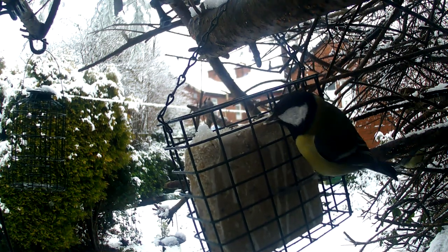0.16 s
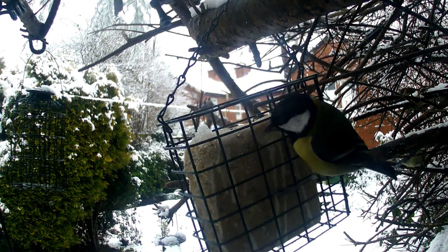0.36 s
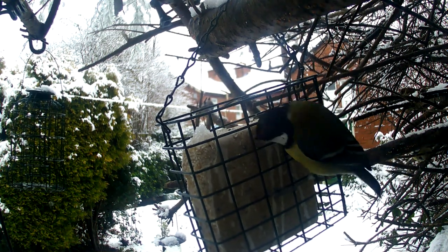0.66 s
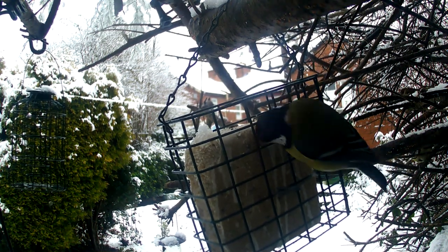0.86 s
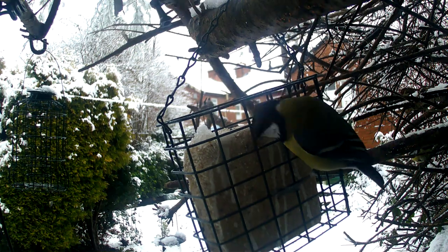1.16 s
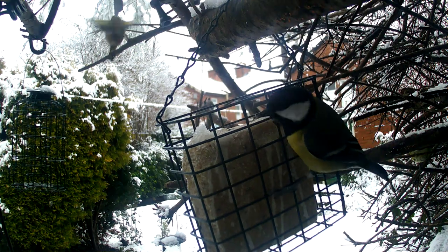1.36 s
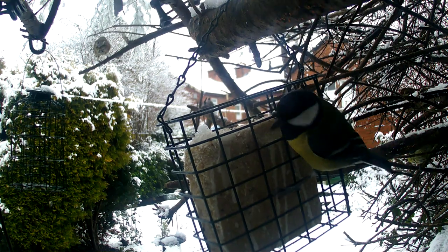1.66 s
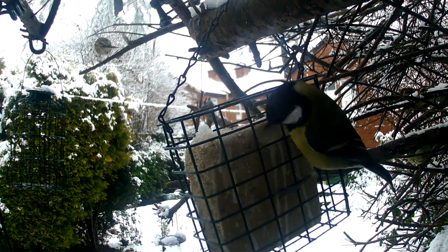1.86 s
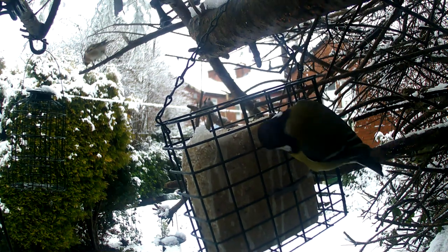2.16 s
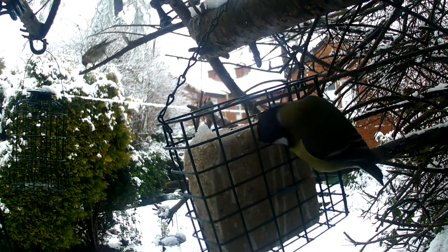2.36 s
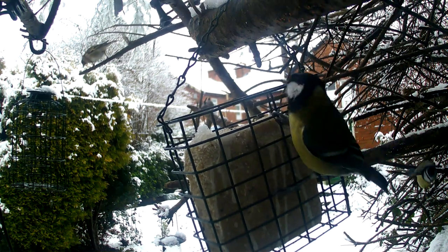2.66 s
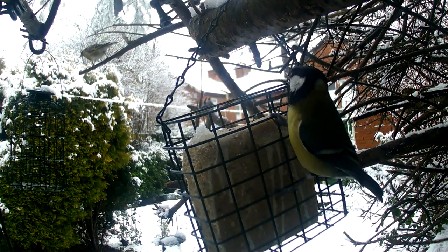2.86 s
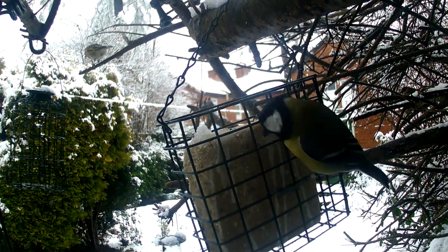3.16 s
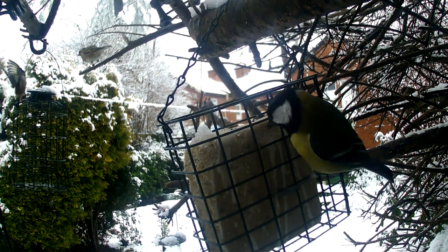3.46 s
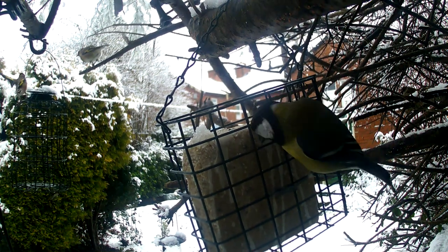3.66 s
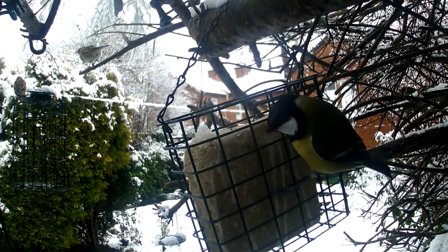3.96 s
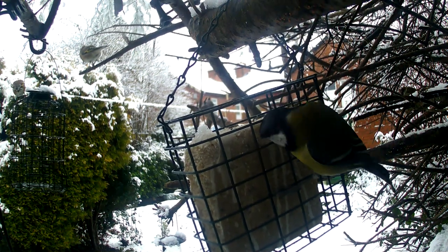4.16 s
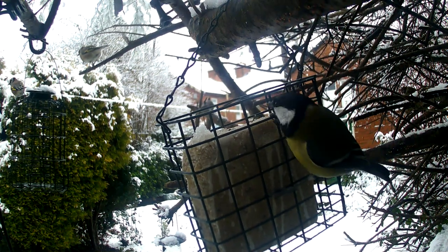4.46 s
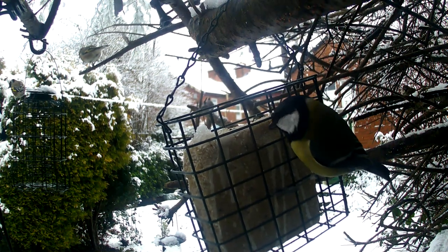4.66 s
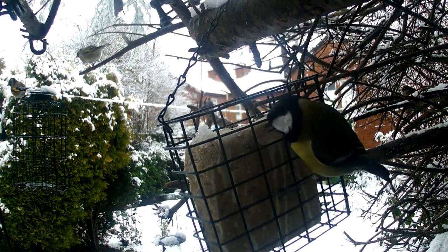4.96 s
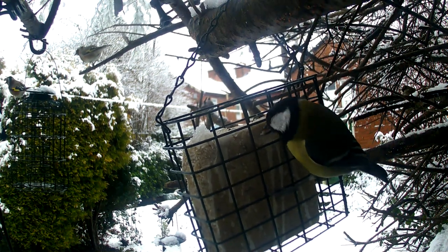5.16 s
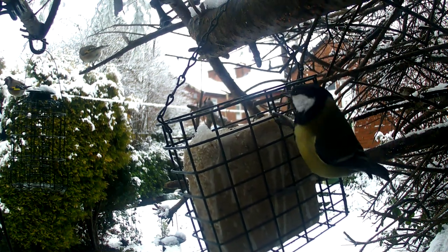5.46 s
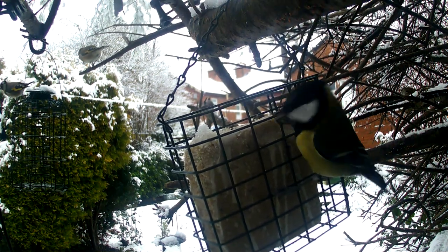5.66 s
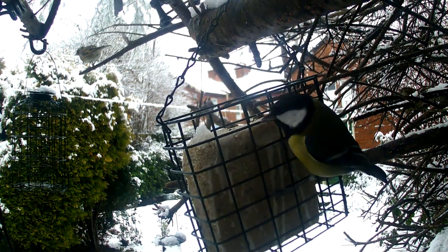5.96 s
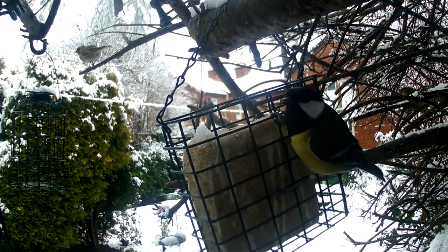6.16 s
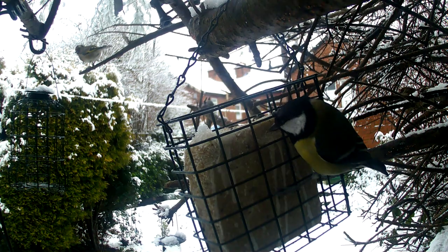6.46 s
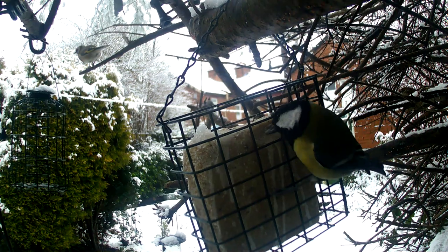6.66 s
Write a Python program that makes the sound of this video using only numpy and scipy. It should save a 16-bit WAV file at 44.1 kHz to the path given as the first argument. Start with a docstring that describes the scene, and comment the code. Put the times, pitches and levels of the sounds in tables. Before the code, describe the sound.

Irregular close beak taps, short whistled bird notes, hoarse sparrow cheeps and a brief scolding tick series over soft distant traffic and deep rumble.

```python
"""A snowy garden: close by, a tit pecks at a fat block in a wire cage, each peck a burst of damped modes.
Farther off, small birds chip, tick and cheep as tones on swept pitch curves; a larger bird calls once.
Behind them lie shaped noise for a low rumble and distant traffic, and wavering tones for a faint hum.
The small microphone dulls birds and pecks above about 3 kHz, most of all near 5 kHz, and adds a thin hiss.
"""
import sys
import numpy as np
from scipy import signal
from scipy.fft import rfft, irfft, next_fast_len
from scipy.io import wavfile
from scipy.ndimage import map_coordinates

SR = 44100
rng = np.random.default_rng(int(sys.argv[2]) if len(sys.argv) > 2 else 0)


def master_out(mix):
    """Clip the mix to full scale and print it as 16-bit PCM to the path in sys.argv[1]."""
    frames = np.transpose(np.atleast_2d(mix))
    ceiling = np.clip(frames, -1, 1)
    pcm = np.round(ceiling * 32767).astype(np.int16)
    wavfile.write(sys.argv[1], SR, pcm)


N = 299439  # length in samples

# The contact notes near and far share a bulge of pitch in octaves and a steepness of swell.
CHIP_ARCH_OCT, CHIP_STEEP = 0.085, 0.76


def amp(db):
    """Decibels to gain."""
    return 10 ** (np.asarray(db) / 20)


def unit(x):
    """Scale to rms 1."""
    return x / np.sqrt(np.mean(x ** 2) + 1e-20)


def wobble(rate, size):
    """A smooth random curve of size samples, with rate knots a second."""
    knots = rng.standard_normal(size // 16 + 8)
    return map_coordinates(knots, [np.arange(size) * rate / SR], mode="mirror")


def filtered(x, response):
    """x times a gain that depends on frequency."""
    m = next_fast_len(N + 8192)
    gain = response(np.fft.rfftfreq(m, 1 / SR))
    return irfft(rfft(x, m) * gain, m)[:N]


def coloured(x, points):
    """x through a (Hz, dB) curve on a log frequency axis."""
    f, db = np.transpose(points)
    return filtered(x, lambda hz: amp(np.interp(np.log(hz + 1), np.log(f), db)))


def noise(points):
    """Noise of rms 1 with the given spectral shape."""
    return unit(coloured(rng.standard_normal(N), points))


def add(track, s, sound):
    """Mix a sound into the track at s seconds."""
    part = track[max(round(s * SR), 0):][:len(sound)]
    part += sound[:len(part)]


def voice(hz, overtones_db):
    """A tone on a pitch curve: a sum of sine harmonics, with one level for each."""
    phase = 2 * np.pi * np.cumsum(hz) / SR
    harmonics = sum(amp(db) * np.sin((k + 1) * phase) for k, db in enumerate(overtones_db))
    return np.sqrt(2) * harmonics


def arch(length, pitch_hz, sweep, bulge, steep, crest=.5, peak_db=0):
    """Pitch and loudness of a note: a sweep with a bulge (both in octaves) under one swell.

    The swell peaks at crest, a share of the length; peak_db deepens its fall towards both ends.
    """
    u = np.linspace(-1, 1, max(int(length * SR), 8))
    off_crest = np.interp(u, [-1, np.clip(2 * crest - 1, -1, 1), 1], [1, 0, 1])
    swell = np.abs(np.cos(np.pi * off_crest / 2)) ** steep * amp(-peak_db * off_crest)
    hz = pitch_hz * 2 ** (sweep * u / 2 - bulge * u ** 2)
    return hz, swell


def whistle(length, pitch_hz, sweep, rough, bulge, steep):
    """One nearly pure note; roughness makes its pitch and loudness tremble."""
    hz, swell = arch(length, pitch_hz, sweep, bulge, steep, crest=0.51)
    hz = hz * (1 + 0.059 * rough * wobble(600, len(hz)))
    tremble = unit(amp(4.1 * rough * wobble(320, len(hz))))
    return swell * tremble * voice(hz, [0, -26])


def garden(x, wet_db, t60, echo_db):
    """Nearby walls return a few weak copies; branches scatter a short tail."""
    t = np.arange(SR // 2) / SR
    tail = rng.standard_normal(len(t)) * amp(-60 * t / t60) * (1 - np.exp(-t / 0.0046))
    answer = amp(wet_db) * tail / np.linalg.norm(tail)
    for delay, db in [(.0065, -1), (.011, 0), (.019, -2.5)]:
        answer[round(delay * SR)] += amp(echo_db + db)
    return x + signal.fftconvolve(x, answer)[:N]


def rumble():
    """Low noise that sways at random and rises in broad swells, with a wandering deep drone in it."""
    # Each row: frequency in Hz, relative density in dB per Hz.
    rumble_shape = [(10, -11.5), (22, 7.5), (32, -3), (38, -5.5), (48, -3.5), (57, -5), (78, -7.5),
                    (100, -19.5), (140, -28), (300, -61)]
    # Each row: crest in seconds, half width in seconds (to 1/e of the rise), rise in dB.
    swells = [(1.2, 0.37, 2.5), (3.35, 0.26, 4.5), (4.5, 0.1, 3), (5.57, 0.12, 5)]
    rest_db, sway_db, sway_per_s = -45, 1.46, 9
    drone_hz, drone_wander_hz, drone_db = 43.63, 3.5, -2.5  # drone level against the noise
    t = np.arange(N) / SR
    swell_db = sum(db * np.exp(-((t - s) / width) ** 2) for s, width, db in swells)
    drone = voice(drone_hz + drone_wander_hz * wobble(11, N), [drone_db])
    level = amp(rest_db + swell_db + sway_db * wobble(sway_per_s, N))
    return level * (noise(rumble_shape) + drone)


def traffic():
    """The wash of distant traffic: noise weakening towards the treble, its level swaying slightly."""
    # Each row: frequency in Hz, relative density in dB per Hz.
    traffic_shape = [(59, -39.5), (100, -3.5), (183, -4), (205, -5), (364, -6.5), (466, -9.5), (725, -10),
                     (813, -7.5), (882, -8), (1040, -9.5), (1150, -11.5), (1390, -13.5), (1640, -15),
                     (3160, -22), (5000, -43), (6500, -79), (11000, -120)]
    return amp(-51.5 + 0.49 * wobble(3.73, N)) * noise(traffic_shape)


def hum():
    """A few low tones, each wavering in pitch and level."""
    # Each row: middle frequency in Hz, middle level in dB rms.
    hum_tones = [(120, -66), (151, -63), (181, -61.5), (332, -67), (361, -70.5)]
    out = np.zeros(N)
    for hz, db in hum_tones:
        level = amp(db + 1.8 * wobble(4, N))
        out += level * voice(hz + 1.52 * wobble(7, N), [0])
    return out


def hiss():
    """The microphone's own thin, steady noise, strongest near 7 kHz."""
    # Each row: frequency in Hz, relative density in dB per Hz.
    hiss_shape = [(3000, -27.5), (4500, -23.5), (5300, -3.5), (6200, 4), (7100, 10), (7400, -6)]
    return amp(-72.5) * noise(hiss_shape)


def ring(modes, pitch_hz):
    """A blow on heavily damped modes; neighbouring modes start in opposite directions."""
    t = np.arange(SR // 40) / SR
    rise = 1 - np.exp(-t / .00008)
    out = np.zeros(len(t))
    for k, (ratio, db, t60) in enumerate(modes):
        decay = amp(db + rng.normal(0, 1) - 60 * t / t60)  # each blow excites the modes a little differently
        out += (-1) ** k * decay * np.sin(2 * np.pi * pitch_hz * ratio * t)
    return rise * out


def pecks():
    """Beak on fat and wire: each peck is a dull knock in the block and a sharp tick of the beak."""
    # Each row: start in seconds, gain of the knock in dB, gain of the tick in dB, tick pitch in Hz.
    blows = [(0.0594, -63, -32.5, 2550), (0.1175, -29.5, -36.5, 2930), (.7710, -34.5, -37, 2200),
             (0.9613, -26.5, -25.5, 2520), (1.248, -26, -31, 2380), (1.9924, -48, -31, 2920),
             (2.2172, -30.5, -30.5, 2270), (2.4715, -35, -31.5, 2700), (3.2010, -44, -38, 2100),
             (3.361, -32, -44, 2190), (3.4052, -48, -43, 2800), (3.6939, -28, -34, 2570),
             (4.2350, -50, -40.5, 2500), (4.4030, -34.5, -41, 2400), (4.9443, -34, -44, 2900),
             (5.1914, -32.5, -33, 2240), (5.4294, -38, -44, 2800), (5.8060, -36, -40, 2880),
             (5.9820, -31.5, -40, 2480)]
    # Modes of the fat block. Each row: multiple of its lowest mode, relative level in dB, t60 in seconds.
    block_modes = [(1, 3.5, 0.0056), (1.6, -1, 0.0057)]
    # Modes of the beak's tick. Each row: multiple of the tick pitch, relative level in dB, t60 in seconds.
    beak_modes = [(1, 5.5, 0.003), (1.35, -1.5, 0.0043), (1.8, 1.5, 0.0019)]
    block_hz = 915  # lowest mode of the fat block
    out = np.zeros(N)
    for s, knock_db, tick_db, tick_hz in blows:
        knock = amp(knock_db) * ring(block_modes, block_hz)
        tick = amp(tick_db) * ring(beak_modes, tick_hz)
        add(out, s, knock + tick)
    return out


def chips():
    """Short whistled contact notes, most of them rising, some clear and some trembling."""
    # Each row: start in seconds, length in seconds, mid-note pitch in Hz, sweep in octaves,
    # level in dB ahead of garden and microphone, roughness (0 is clear).
    notes = [(0.063, 0.022, 3490, 0.1, -45.5, .3), (1.025, .07, 4700, 0.06, -53, 0.3),
             (1.754, 0.026, 2770, 0.2, -52, 0.65), (1.786, 0.021, 2760, 0.2, -48, 0.33),
             (1.908, 0.045, 2980, -.06, -60, .9), (1.94, 0.022, 3950, 0.4, -54, 0.5),
             (1.949, 0.027, 3930, .7, -52, 1.2), (2.011, 0.02, 2770, 0.19, -56, .8),
             (2.015, .043, 3760, -0.7, -54, 0.73), (2.052, 0.039, 3880, .08, -48, 0.33),
             (2.535, 0.012, 3670, 0.66, -45, 0.25), (2.632, 0.022, 3390, 0.4, -45.5, 0.7),
             (2.729, 0.029, 3150, 0, -44, 0.42), (3.223, 0.014, 2830, 0.12, -55.5, 0.2),
             (3.346, 0.029, 3330, .25, -55.5, 0.65), (3.458, .022, 2760, .05, -62, .3),
             (3.523, 0.03, 3000, -0.06, -54.5, 0.4), (3.587, 0.02, 3150, -.1, -60, 0.7),
             (4.113, 0.014, 2750, .24, -50.5, 0.2), (4.316, 0.016, 2920, 0.1, -57.5, .3),
             (4.683, 0.13, 3330, .02, -61.5, 0.6), (4.924, .03, 4440, -0.3, -54, .5),
             (5.214, 0.016, 2910, 0.16, -48.5, 0.4), (5.246, 0.021, 2850, 0.26, -45, 0),
             (5.351, 0.021, 3420, 0.22, -43, 0.2), (5.461, 0.019, 3060, 0.17, -44.5, 0),
             (5.86, 0.015, 4000, .29, -46.5, 0.16), (5.966, 0.016, 3320, 0.58, -37.5, .15),
             (6.088, 0.0203, 3330, 0.31, -44.5, 0.3), (6.272, 0.029, 4050, 0.34, -52, 0.6)]
    out = np.zeros(N)
    for s, length, hz, sweep, db, rough in notes:
        add(out, s, amp(db) * whistle(length, hz, sweep, rough, CHIP_ARCH_OCT, CHIP_STEEP))
    return out


def far_chips():
    """Birds across the garden put in a few faint, trembling notes at random times and pitches."""
    count, length_s, middle_hz, spread_oct, level_db, rough = 4, .05, 3300, .19, -64, 1
    out = np.zeros(N)
    for when, pitch, sweep in rng.uniform(-1, 1, (count, 3)):
        hz = middle_hz * 2 ** (spread_oct * pitch)
        note = whistle(length_s, hz, spread_oct * sweep, rough, CHIP_ARCH_OCT, CHIP_STEEP)
        add(out, (when + 1) / 2 * N / SR, amp(level_db) * note)
    return out


def syllable(length, pitch_hz, sweep, crest, rasp, flutter_hz):
    """A tone that an uneven flutter of the syrinx splits into grainy side tones, less so at its crest."""
    flutter_fall_oct, flutter_drift_oct = .4, .25  # the flutter slows through a syllable and drifts
    flutter_db, flutter_bend = 8, 0.15  # its depth in level and as a share of the pitch, at rasp 1
    jitter, grain_db = .05, 3.2  # random unsteadiness of pitch (share) and level, at rasp 1
    core_clears = .45  # share of the rasp that is gone at the crest
    hz, swell = arch(length, pitch_hz, sweep, bulge=.07, steep=0.95, crest=crest, peak_db=10.5)
    n = len(hz)
    rasp = rasp * (1 - core_clears * swell)
    fall = flutter_fall_oct * np.linspace(.5, -.5, n)
    rate = flutter_hz * 2 ** (fall + flutter_drift_oct * wobble(260, n))
    beat = 2 * np.pi * np.cumsum(rate) / SR
    hz = hz * (1 + rasp * (flutter_bend * np.sin(beat) + jitter * wobble(704.6, n)))
    grain = grain_db * np.sqrt(np.abs(rasp)) * wobble(260, n)
    pulse = unit(amp(rasp * flutter_db * np.sin(beat - 1.5) + grain))
    return swell * pulse * voice(hz, [0, -28])


def cheeps():
    """Sparrow cheeps: a hoarse held tone, an upward slur and a closing note over a clearer low voice.

    The windpipe and beak then colour both voices.
    """
    # Hoarse upper voice, three rows a cheep. Each row: start in seconds, length in seconds,
    # middle pitch in Hz, sweep in octaves, level in dB ahead of the throat,
    # loudest point as a share of the length, rasp depth, middle flutter rate in Hz.
    hoarse_tones = [(0.444, .09, 2936, -.1, -41, 0.54, 0.92, 337),
                    (.558, 0.0315, 3280, .55, -42.5, 0.36, 0.56, 764),
                    (0.581, 0.026, 2647, -.1, -41, 0.3, 2, 613),
                    (4.412, .08, 2984, .08, -40.5, 0.58, 1.13, 419),
                    (4.512, 0.043, 3200, .42, -39, 0.59, 0.8, 770),
                    (4.546, .026, 2885, -0.24, -35, 0.3, 0.94, 327),
                    (6.416, 0.0844, 3037, 0.1, -37, 0.42, 0.83, 333),
                    (6.543, 0.03, 3260, 0.68, -38.5, 0.48, 0.83, 600),
                    (6.571, .028, 3490, .6, -48, 0.46, 0.78, 716)]
    # Clearer lower voice. Each row: start in seconds, length in seconds, middle pitch in Hz,
    # sweep in octaves, level in dB ahead of the throat, roughness (0 is clear).
    low_tones = [(.458, 0.038, 1420, 0.071, -52, 0.75), (.549, 0.046, 1780, 1.2, -52, 0.24),
                 (4.427, .036, 2100, .6, -56, 0.8), (4.521, 0.04, 1720, 0.54, -50, 0.26),
                 (4.53, 0.022, 2510, .5, -49, 0.46), (6.432, 0.055, 1550, .1, -54.5, 1.1),
                 (6.541, 0.036, 1700, 0.87, -48.5, 0.4), (6.580, 0.014, 1920, .1, -48, .3)]
    # Windpipe and beak. Each row: frequency in Hz, gain in dB.
    throat = [(1200, -3.5), (2400, -2.5), (2950, -2.5), (3500, -2.5), (4200, 10), (5500, 18.5),
              (7000, -20.5)]
    out = np.zeros(N)
    for s, length, hz, sweep, db, crest, rasp, flutter_hz in hoarse_tones:
        add(out, s, amp(db) * syllable(length, hz, sweep, crest, rasp, flutter_hz))
    for s, length, hz, sweep, db, rough in low_tones:
        add(out, s, amp(db) * whistle(length, hz, sweep, rough, bulge=.09, steep=0.3))
    return coloured(out, throat)


def ticks():
    """A scolding bird flicks its pitch up about an octave in milliseconds; the flick levels off and fades."""
    # Each row: start in seconds, starting pitch in Hz, top pitch it closes in on in Hz,
    # level in dB ahead of garden and microphone.
    flicks = [(2.7262, 3200, 7220, -38), (2.7928, 2300, 4570, -45), (2.8006, 2700, 6760, -33.5),
              (2.8836, 2600, 6200, -33), (2.8900, 2180, 4200, -45), (2.9686, 2650, 7200, -34),
              (2.9848, 2900, 5500, -42), (3.0592, 2970, 6660, -37), (3.0745, 2800, 6400, -37)]
    length_s, rise_s, fade_db, jitter = 0.0068, .0027, 15, 0.041  # rise: time constant; jitter: pitch share
    out = np.zeros(N)
    t = np.arange(int(length_s * SR)) / SR
    swell = np.abs(np.sin(np.pi * t / length_s)) ** 0.21 * amp(-fade_db * t / length_s)
    for s, start_hz, top_hz, db in flicks:
        hz = top_hz + (start_hz - top_hz) * np.exp(-t / rise_s)
        hz = hz * (1 + jitter * wobble(1120, len(t)))
        add(out, s, amp(db) * swell * voice(hz, [0]))
    return out


def kya():
    """One short, arched, jackdaw-like call: a strong fundamental under flickering overtones."""
    # The call's course. Each row: time in seconds, pitch in Hz, level in dB ahead of garden and
    # microphone, middle level of its octave in dB against the fundamental.
    course = [(5.31, 1260, -46, -7), (5.315, 1440, -46, -13), (5.319, 1534, -36, -21),
              (5.323, 1597, -44, -21), (5.331, 1596, -40.5, -21), (5.340, 1475, -33.5, -16),
              (5.343, 1500, -44, -12), (5.345, 1350, -34, -20), (5.349, 1200, -42.5, -16),
              (5.355, 1060, -47, -10)]
    flicker_db = 4.5
    out = np.zeros(N)
    s, hz, db, octave_db = np.transpose(course)
    t = np.arange(s[0], s[-1], 1 / SR)
    pitch = np.interp(t, s, hz) * (1 + 0.0091 * wobble(460, len(t)))
    flicker = amp(np.interp(t, s, octave_db) + flicker_db * wobble(374, len(t)))
    octave_hz = 2 * pitch * (1 + .025 * wobble(800, len(t)))
    overtones = flicker * voice(octave_hz, [0, -23])
    add(out, s[0], amp(np.interp(t, s, db)) * (voice(pitch, [0]) + overtones))
    return out


def scene():
    """The pecks are close and nearly dry; the callers sit farther off among the branches."""
    # How the microphone hears birds and pecks. Each row: frequency in Hz, gain in dB.
    microphone = [(100, -7.5), (3200, 0.5), (3600, -5), (4100, -14), (4500, -22), (5000, -27), (6000, -19),
                  (7200, -6.5)]
    background = rumble() + traffic() + hum() + hiss()
    feeder = garden(pecks(), wet_db=-14, t60=0.065, echo_db=-34.5)
    whistles = garden(chips() + far_chips(), wet_db=-13.5, t60=0.16, echo_db=-17.5)
    sparrows = garden(cheeps(), wet_db=-5, t60=0.23, echo_db=-15)
    scolding = garden(ticks(), wet_db=-7.5, t60=0.27, echo_db=-18)
    caller = garden(kya(), wet_db=-18, t60=0.1, echo_db=-22)
    foreground = feeder + whistles + sparrows + scolding + caller
    return (coloured(foreground, microphone) + background)[None]


def record(dry):
    """The recorder cuts off steeply above its band limit."""
    top_hz = 7450
    return filtered(dry[0], lambda hz: 1 / np.sqrt(1 + (hz / top_hz) ** 160))[None]


dry = scene()
out = record(dry)
master_out(out)
```